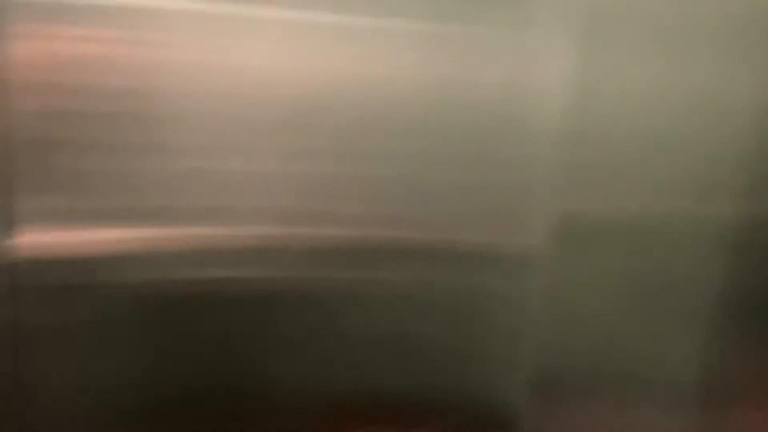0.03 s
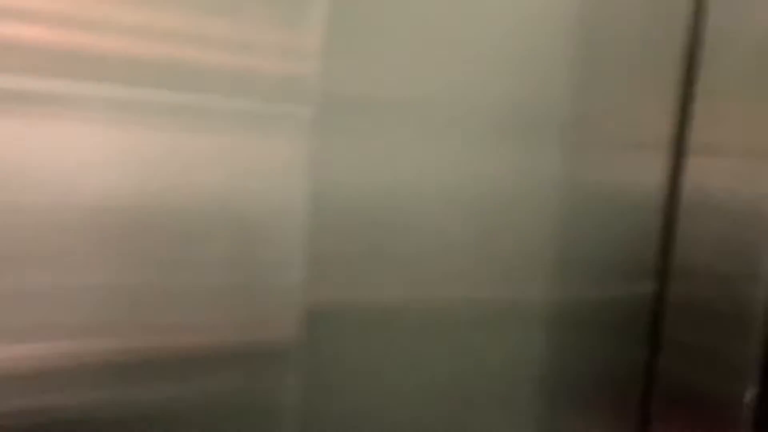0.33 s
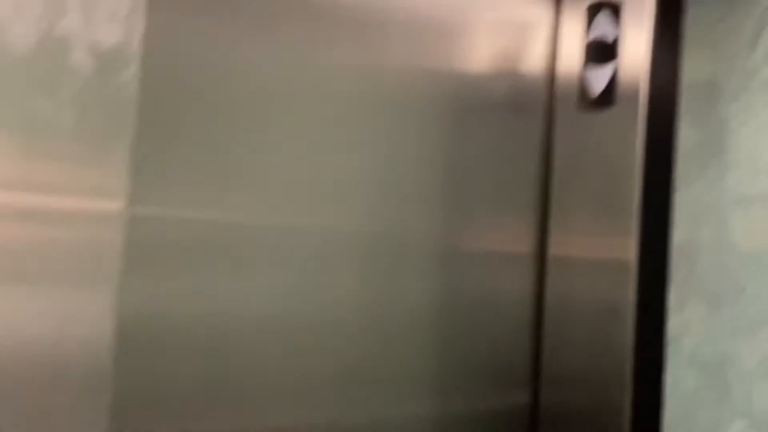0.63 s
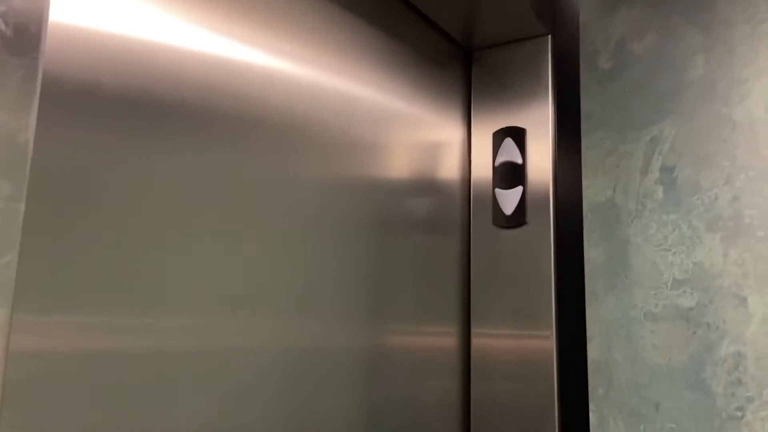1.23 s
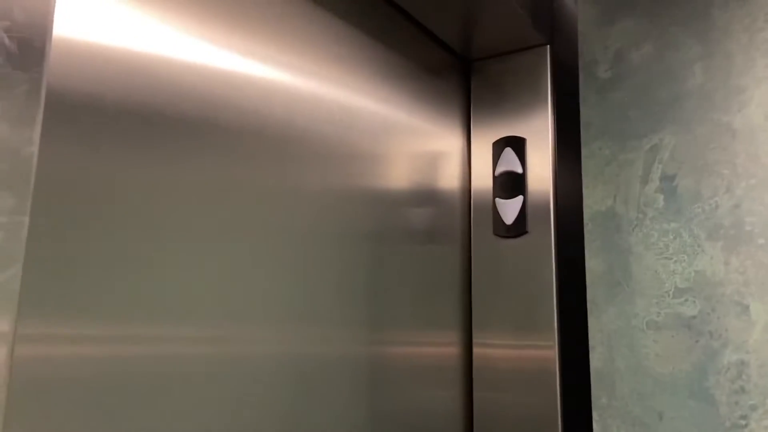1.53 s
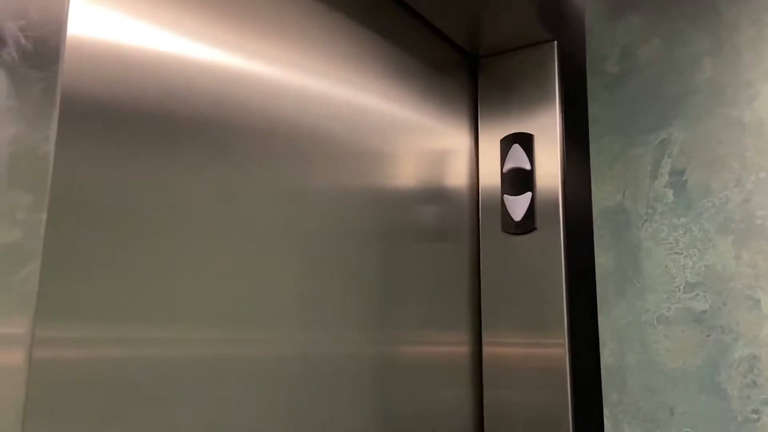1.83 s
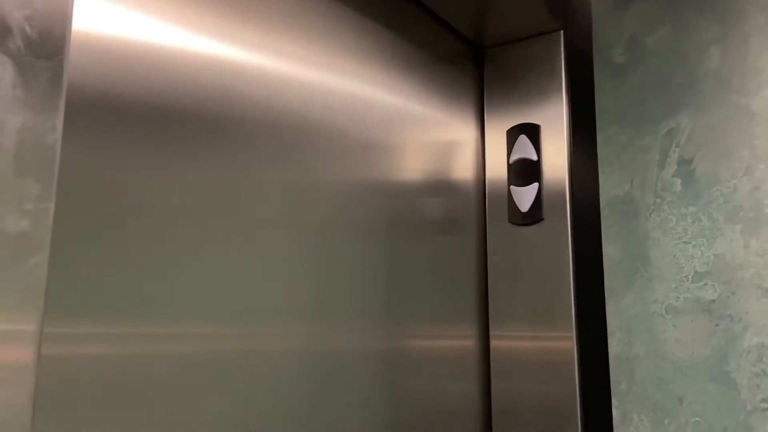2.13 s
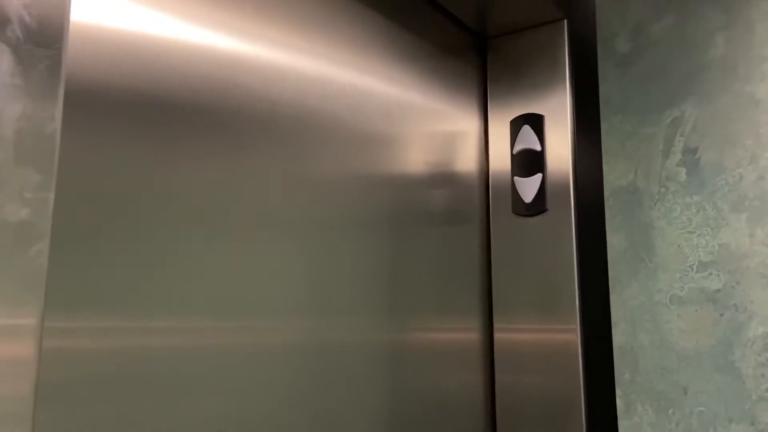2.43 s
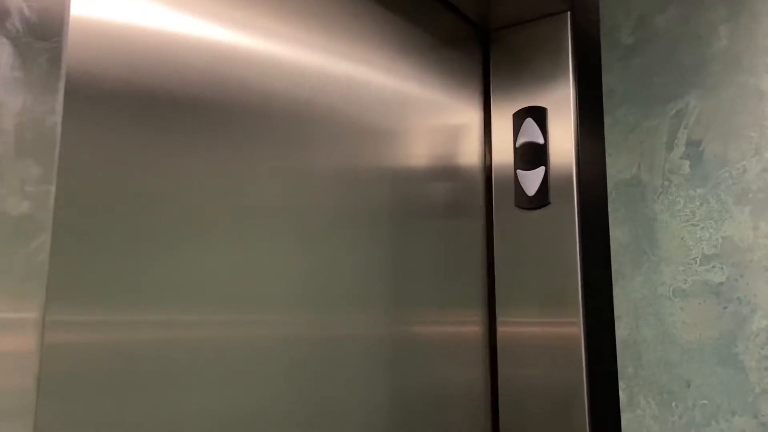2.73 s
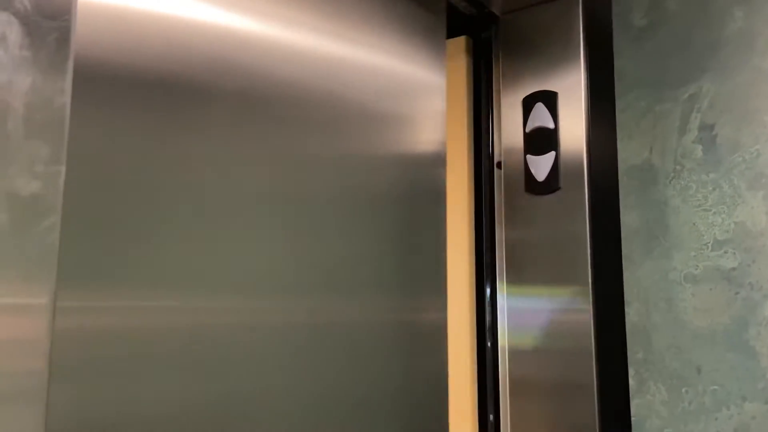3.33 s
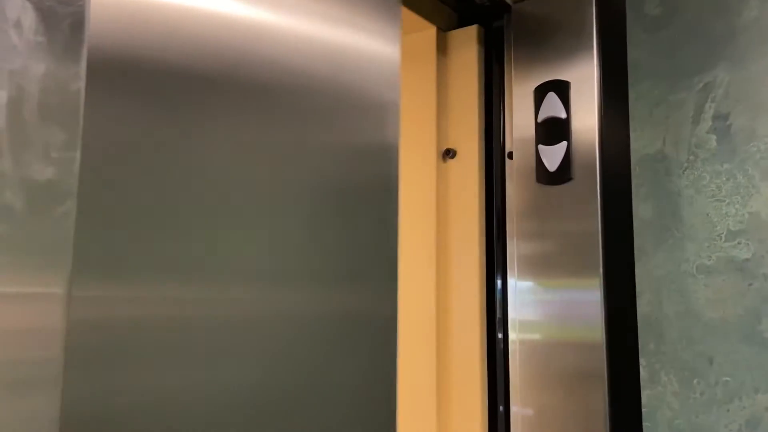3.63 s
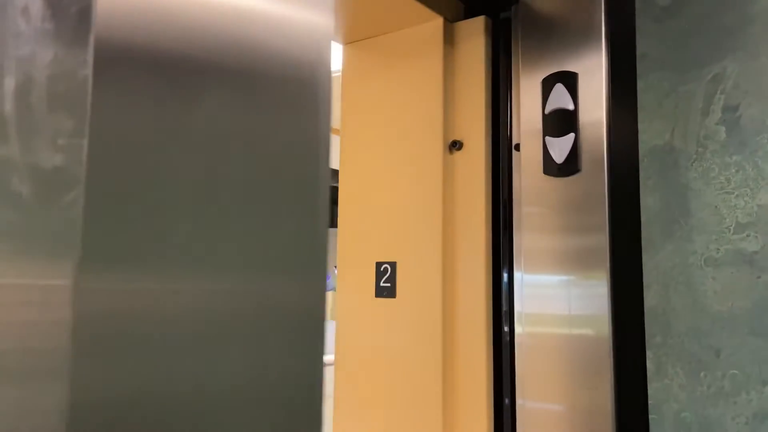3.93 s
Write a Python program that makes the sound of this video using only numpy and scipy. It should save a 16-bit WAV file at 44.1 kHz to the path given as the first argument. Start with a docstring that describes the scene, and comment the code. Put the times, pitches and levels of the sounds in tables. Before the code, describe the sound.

An elevator slows with a low throbbing rumble and fading hum over a steady fan, heard inside the small cabin, with a faint hiss and light ticks before 1.5 seconds. Around 2.5 seconds the door lock clunks sharply twice, followed by ringing steel rattles. From about 3 seconds to the end at 4, the door rolls open with a motor whirr, thin whine, brief squeaks and soft low thumps.

```python
"""Steel elevator car stops, door opens.

The small cabin booms as the car slows, over a steady fan and a faint high whine; the hoist hum fades.
The door lock clunks twice and the coupler takes hold: struck steel parts chatter and ring.
The door rolls open with motor hum, belt whirr, a singing pulley and gritty, squeaking rollers,
while soft pushes on the big panels make a low rumble."""
import sys
import numpy as np
from scipy import signal
from scipy.fft import rfft, irfft
from scipy.io import wavfile

SR = 44100
rng = np.random.default_rng(int(sys.argv[2]) if len(sys.argv) > 2 else 0)


def int16_out(signal):
    """Quantize to a 16-bit WAV file."""
    q = np.round(np.clip(np.atleast_2d(signal).T, -1, 1) * 32767)
    wavfile.write(sys.argv[1], SR, q.astype(np.int16))


N = 176400
T, HZ = np.arange(N) / SR, np.maximum(np.fft.rfftfreq(N, 1 / SR), 1)


def undb(db):
    return 10 ** (np.asarray(db) / 20)


def unit_rms(x):
    return x / np.sqrt(np.mean(x ** 2))


def envelope(rows):
    """Gain over time from rows of time_s, level_db."""
    return undb(np.interp(T, *np.array(rows).T))


def at_hz(rows, hz=HZ, column=1):
    """Table column interpolated over log frequency."""
    rows = np.array(rows)
    return np.interp(np.log(hz), np.log(rows[:, 0]), rows[:, column])


def filtered(x, gain):
    return irfft(rfft(x) * gain, N)


def noise():
    """Independent mid and side noise."""
    return rng.standard_normal((2, N))


def resonate(rows, steady):
    """Randomly driven resonances (pitch_hz, width_hz, level_db); steady, 0-1, evens out their swell."""
    out, size = 0, N // 50
    offset_hz, coarse_s = np.fft.fftfreq(size, N / SR / size), np.linspace(0, N / SR, size)
    for pitch_hz, width_hz, level_db in rows:
        push = rng.standard_normal((2, 2, size))
        phasor = np.fft.ifft((push[0] + 1j * push[1]) / (1 + (offset_hz / width_hz) ** 4))
        phasor = phasor / np.abs(phasor) ** steady
        phasor = phasor * undb(level_db) / np.sqrt(np.mean(np.abs(phasor) ** 2) / 2)
        wander = np.array([np.interp(T, coarse_s, channel) for channel in phasor])
        out = out + (wander * np.exp(2j * np.pi * pitch_hz * T)).real
    return out


def walls(x, echo_db=-7, t60_s=0.1):
    """Close steel walls add a short, dense, boxy echo. Output at unit RMS."""
    echo = noise() * np.exp(-np.log(1000) * T / t60_s)
    response = rfft(echo / np.linalg.norm(echo, axis=1, keepdims=True))
    return unit_rms(filtered(x, 1 + undb(echo_db) * response * HZ / np.hypot(HZ, 800)))


def fan(air_db=-41, whine_hz=15680, whine_db=-75.5):
    """Steady moving air, fan hum and a thin electrical whine."""
    # air spectrum: freq_hz, relative_db
    air_spectrum = [(25, -36), (40, -10), (150, -17), (290, -16), (410, -26.5), (560, -22.5), (900, -35.5),
                    (1500, -44), (3400, -55), (7000, -61.5), (11000, -88)]
    # fan hum: pitch_hz, width_hz, level_db
    hum = [(269.9, 2, -45.5), (326.5, 15, -58)]
    air = walls(filtered(noise(), undb(at_hz(air_spectrum)))) * undb(air_db)
    return air + resonate(hum, steady=0.95) + resonate([(whine_hz, 25, whine_db)], steady=0.44)


def cabin_boom():
    """Cabin air and floor resonances throb against each other."""
    # air and floor resonances: pitch_hz, width_hz, relative_db
    air_modes = [(80.5, 3, -0.5)]
    floor_modes = [(65.5, 2.2, 0.5), (57.1, 2.5, -5)]
    # their envelopes: time_s, level_db
    air_level = [(0, -28.5), (.35, -36), (.48, -31.5), (.56, -34.5), (.72, -27.5), (.87, -29.5),
                 (.99, -40.5), (1.09, -20.5), (1.205, -40), (1.29, -25), (1.42, -37.5), (1.62, -40.5),
                 (1.74, -27), (1.88, -40), (2.02, -36), (2.11, -23), (2.28, -31), (2.36, -45),
                 (2.45, -32.5), (2.65, -30.5), (2.83, -48), (3.05, -36.5), (3.2, -49.5), (4, -38.5)]
    floor_level = [(0, -38), (1.2, -33.5), (1.41, -29.5), (1.52, -39), (2, -39), (2.7, -36.5), (3.1, -46.5),
                   (4, -37.5)]
    air = resonate(air_modes, steady=0.92) * envelope(air_level)
    return air + resonate(floor_modes, steady=0.85) * envelope(floor_level)


def hoist(fade_db_per_s=6):
    """The hoist hums, whines and drones under load, fading as the car slows."""
    # hoist resonances: pitch_hz, width_hz, relative_db
    hum_modes = [(224.5, 5.3, -48), (534.2, 41, -52.5), (276.7, 57, -50), (835, 9.5, -64),
                 (1150, 75, -67.5), (2810, 230, -76)]
    whine_modes = [(371.4, 1.3, -45)]
    drone_modes = [(117.9, .7, -1)]
    # hoist effort and drone envelope: time_s, gain_db
    effort = [(0, 0.5), (1.3, 1.5), (1.6, -1.5), (2.7, -4), (4, -26)]
    drone_level = [(1.35, -42), (1.6, -50), (3, -62.5)]
    hum = resonate(hum_modes, steady=0.23) * envelope(effort)
    whine = resonate(whine_modes, steady=0.32) * undb(-fade_db_per_s * T)
    return hum + whine + resonate(drone_modes, steady=1) * envelope(drone_level)


def guide_shoes():
    """Sliding guide shoes hiss."""
    # hiss envelope: time_s, level_db
    level = [(.2, -77), (.45, -66.5), (.85, -67), (1.6, -77)]
    spectrum = undb(at_hz([(1500, -6.5), (5000, -8.5), (15000, -19)]))
    return unit_rms(filtered(noise(), spectrum)) * envelope(level)


def bumps(rise_s=0.02, fall_s=0.089):
    """Soft pushes make the big panels wobble briefly."""
    # car and door bumps: start_s, level_db, pitch_hz
    pushes = [(1.34, -41, 41.3), (2.6, -41.5, 133.4), (3.335, -30.5, 42.44), (3.66, -35, 40.1),
              (3.8, -27.5, 57.33)]
    out = 0
    for start_s, level_db, pitch_hz in pushes:
        age_s = np.maximum(T - start_s, 0)
        swell = (1 - np.exp(-age_s / rise_s)) ** 2 * np.exp(-age_s / fall_s)
        out = out + resonate([(pitch_hz, pitch_hz * 0.083, level_db)], steady=1) * swell / swell.max()
    return out


def knocks():
    """Struck steel cracks, then rings with the part's clear modes and the door's dense wash."""
    # metal knocks: start_s, level_db, tilt_db_per_octave, t60_factor, part
    strikes = [(.348, -50, 4, 0.97, "guide"), (1.339, -57.5, 5.5, .6, "guide"),
               (1.485, -56.5, 3.5, 0.64, "guide"), (2.381, -51, 1.5, 3.4, "latch"),
               (2.455, -36, 3, 0.22, "latch"), (2.464, -34, 2, 0.96, "latch"),
               (2.532, -51, 4, 0.85, "latch"), (2.570, -40.5, -1.5, 1.08, "hook"),
               (2.583, -36.5, 5.5, 0.57, "hook"), (2.612, -46, 6, 0.81, "hook"),
               (2.743, -55.5, -0.5, 0.82, "hook"), (2.753, -46.5, -1.5, 0.35, "latch"),
               (2.82, -55, 4.5, 0.8, "latch"), (2.874, -50.5, -0.5, 0.84, "latch"),
               (2.906, -40, 1.5, 1.2, "panel"), (2.94, -45.5, -5.5, 1.2, "panel"),
               (2.988, -48, -2, 2.3, "panel"), (3.083, -43.5, 1, .9, "panel"),
               (3.385, -45.5, 3.5, 1.7, "panel"), (3.866, -46, 2.5, 1.1, "panel")]
    # dense ring of the steel door: freq_hz, relative_db, t60_s
    steel = [(150, -0.5, 0.74), (460, 13.5, 0.42), (870, 4, 0.48), (2430, -5, 0.53), (4980, -9.5, 0.21),
             (15500, -26.5, .19)]
    # modes by part: pitch_hz, relative_db, t60_s
    part_modes = {"latch": [(443.8, -2.5, 0.46), (2420, -10, 0.15), (2643, -10.5, .1), (3440, -11, 0.16),
                  (5120, -16, 0.11)], "hook": [(860, -2, 0.4), (959, -7, 0.42), (2340, -6.5, 0.18),
                  (3470, -14, .17)], "panel": [(536, -6.5, .7), (960, -5, 0.23), (1290, -8, 0.17),
                  (1712, -11.5, 0.29), (2190, -15, 0.37)], "guide": [(4960, -19, .1)]}
    crack_db, crack_s, build_s = -1.5, 0.0019, 0.0037
    chatter_db, chatter_hz, chatter_s = 0.5, 260, 0.018
    buzz_depth, buzz_hz = 0.5, 110
    size = SR // 2
    out, t = np.zeros((2, N + size)), T[:size]
    centres_hz = 125 * 2 ** (np.arange(15) / 2)
    band_t60_s = at_hz(steel, centres_hz, column=2)
    weights = undb(at_hz(steel, centres_hz)) * np.sqrt(centres_hz)
    weights = weights / np.linalg.norm(weights)
    bins_hz = np.maximum(np.fft.rfftfreq(SR, 1 / SR), 1)
    half_octaves = np.abs(np.log2(bins_hz / centres_hz[:, None, None])) < 1 / 4
    bands = [unit_rms(band) for band in irfft(rfft(noise()[:, :SR]) * half_octaves)]
    build, crack = 1 - np.exp(-t / build_s), undb(crack_db) * np.exp(-t / crack_s)
    # loose parts bounce after contact and buzz as they ring
    bounce = np.tanh(unit_rms(filtered(noise()[0], HZ < chatter_hz)))
    buzz = 1 + buzz_depth * unit_rms(filtered(noise(), HZ < buzz_hz))
    for start_s, level_db, tilt_db_per_octave, t60_factor, part in strikes:
        start, grain = int(start_s * SR), rng.integers(size)
        tilt = lambda hz: undb(tilt_db_per_octave * np.clip(np.log2(hz / 2000), -1, 2))
        fade = lambda t60_s: np.exp(-np.log(1000) * t / (t60_s * t60_factor))
        chatter = undb(chatter_db * bounce[grain:grain + size] * np.exp(-t / chatter_s))
        ring = 0
        for hz, weight, band, t60_s in zip(centres_hz, weights, bands, band_t60_s):
            wash = weight * tilt(hz) * band[:, grain:grain + size]
            ring = ring + wash * (build * fade(t60_s) + crack) * chatter
        for hz, mode_db, t60_s in part_modes[part]:
            offset = rng.integers(N - size)
            mode = np.sin(2 * np.pi * hz * t + rng.uniform(0, 2 * np.pi, (2, 1))) * fade(t60_s)
            ring = ring + undb(mode_db) * tilt(hz) * buzz[:, offset:offset + size] * mode
        out[:, start:start + size] += undb(level_db) * ring
    return out[:, :N]


def squeaks():
    """Rollers catch for a moment: a narrow band squeaks, a wide one scrapes."""
    # roller catches: peak_s, pitch_hz, width_hz, level_db, taper_s
    catches = [(3.226, 880, 70, -42.5, 0.0065), (3.158, 2950, 133, -54.5, 0.015),
               (3.2, 4330, 500, -59.5, .04), (3.37, 1490, 504, -53, 0.019), (3.63, 4640, 450, -58, .022),
               (3.957, 4260, 130, -55.5, 0.014)]
    out = 0
    for peak_s, pitch_hz, width_hz, level_db, taper_s in catches:
        rub = unit_rms(filtered(noise(), 1 / (1 + ((HZ - pitch_hz) / width_hz) ** 4)))
        out = out + undb(level_db) * rub / np.cosh(np.clip((T - peak_s) / taper_s, -20, 20))
    return out


def rollers(speed, gain_db=-44):
    """Rollers run unevenly over a gritty track, louder with speed."""
    # track spectrum: freq_hz, relative_db
    track = [(150, 1), (300, -5.5), (1000, -7), (1600, -15), (2600, -12), (3600, -19), (5200, -21.5),
             (6000, -26), (15000, -38.5)]
    grit_per_s, grit_spread_db, grit_db, grit_decay_s = 250, 3.5, -6, 0.0032
    flutter_db, flutter_hz = 1.4, 30
    hits = rng.random(N) < grit_per_s / SR
    ticks = hits * undb(grit_spread_db * np.minimum(rng.exponential(size=N), 4))
    crunch = noise()[:, :SR // 20] * np.exp(-T[:SR // 20] / grit_decay_s)
    grit = signal.fftconvolve(ticks[None], crunch)[:, :N]
    rolling = walls(filtered(noise() + undb(grit_db) * unit_rms(grit), undb(at_hz(track))))
    flutter = unit_rms(filtered(noise()[0], HZ < flutter_hz))
    return rolling * undb(gain_db + flutter_db * flutter) * speed


def door(motor_on_s=2.39, motor_rise_s=0.14):
    """The motor hums, the belt whirrs and its pulley sings as the door rolls open."""
    # drive resonances: pitch_hz, width_hz, relative_db
    belt_modes = [(1964, 30, -61), (4280, 310, -60), (884, 15, -54), (1284, 18, -59.5), (133.8, 54, -42.5)]
    pulley_modes = [(2600, 25, -55.5), (2656, 19, -58)]
    motor_modes = [(176.4, 3.5, -50), (549.4, 22, -53), (388.3, 60, -49), (249.6, 80, -45.5)]
    # door speed as loudness, pulley envelope: time_s, gain_db
    speed_level = [(2.3, -58.5), (2.45, -9), (2.85, -20), (2.95, -4.5), (3.07, -12.5), (3.15, -2.5),
                   (4, -1)]
    pulley_level = [(2.9, -41), (3.25, -10.5), (3.55, 3.5), (3.63, -2.5), (3.76, 1), (3.82, -4.5),
                    (4, -1.5)]
    speed = envelope(speed_level)
    rolling = rollers(speed)
    belt = resonate(belt_modes, steady=0.28) * speed ** 2
    pulley = resonate(pulley_modes, steady=0.52) * envelope(pulley_level)
    motor = resonate(motor_modes, steady=0.24) * np.clip((T - motor_on_s) / motor_rise_s, 0, 1)
    return rolling + belt + pulley + motor + squeaks()


def scene():
    """Steel walls spread all but the bass between left and right."""
    # stereo width: freq_hz, side_gain_db
    width = [(60, -33), (125, -8), (250, -12), (1000, 1), (2500, -4)]
    # balance: freq_hz, left_minus_right_db
    balance = [(500, .5), (2200, 2), (8000, 0.4)]
    mid, side = cabin_boom() + hoist() + guide_shoes() + fan() + knocks() + bumps() + door()
    side = filtered(side, undb(at_hz(width)))
    lean_db = at_hz(balance) / 2
    return filtered(np.array([mid + side, mid - side]), undb([lean_db, -lean_db]))


def record(dry):
    """The microphone loses the deepest bass, notches the treble twice and cuts the top steeply."""
    # microphone notches: centre_hz, width_hz, depth_db
    notches = [(9100, 420, 26), (13350, 520, 28)]
    bottom_hz, top_hz = 32, 15900
    dips_db = sum(db * np.exp(-((HZ - hz) / width_hz) ** 2) for hz, width_hz, db in notches)
    low_cut = 1 / np.sqrt(1 + (bottom_hz / HZ) ** 8)
    high_cut = 1 / (1 + (HZ / top_hz) ** 400)
    return filtered(dry, low_cut * undb(-dips_db) * high_cut)


dry = scene()
out = record(dry)
int16_out(out)
```